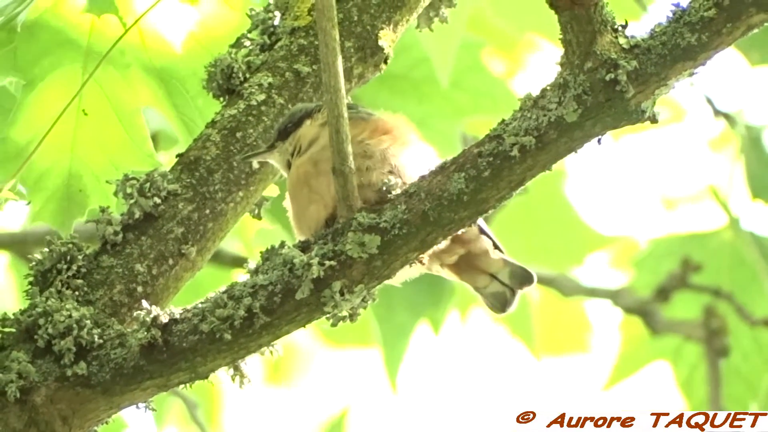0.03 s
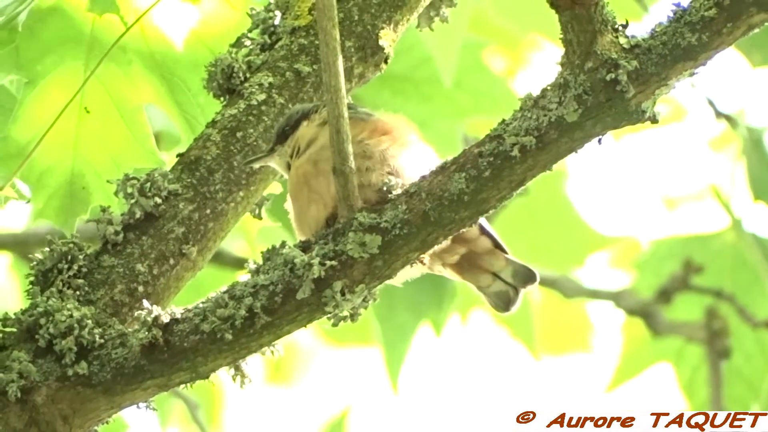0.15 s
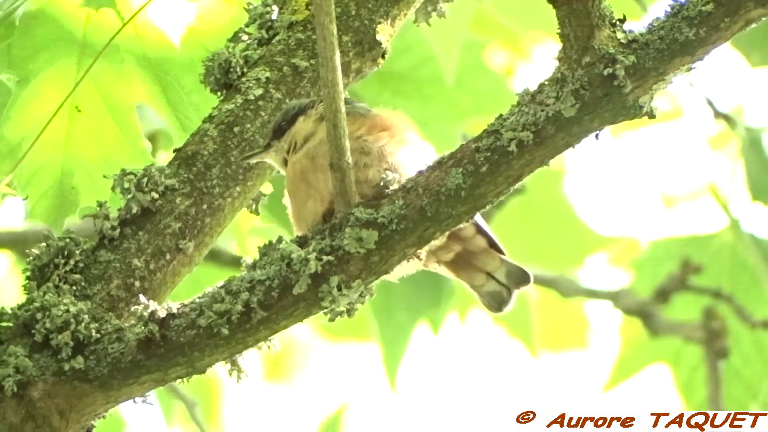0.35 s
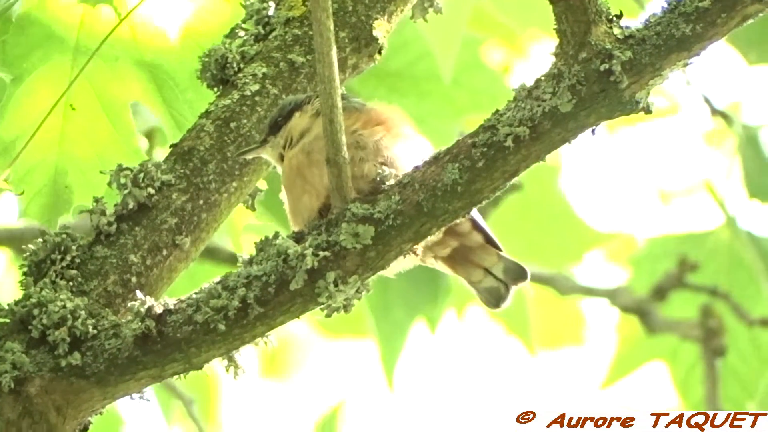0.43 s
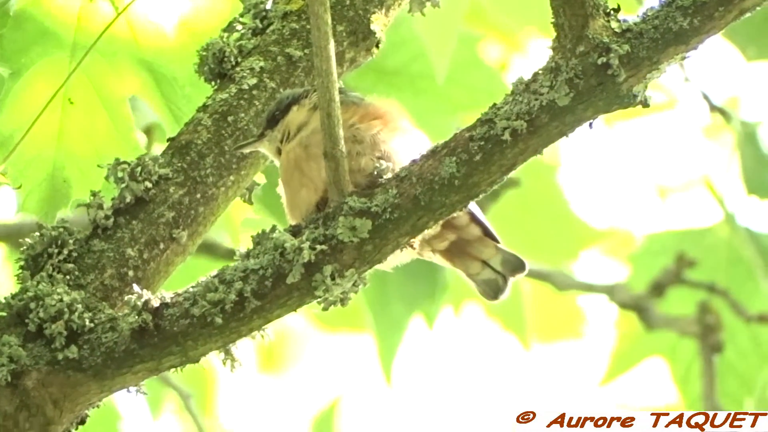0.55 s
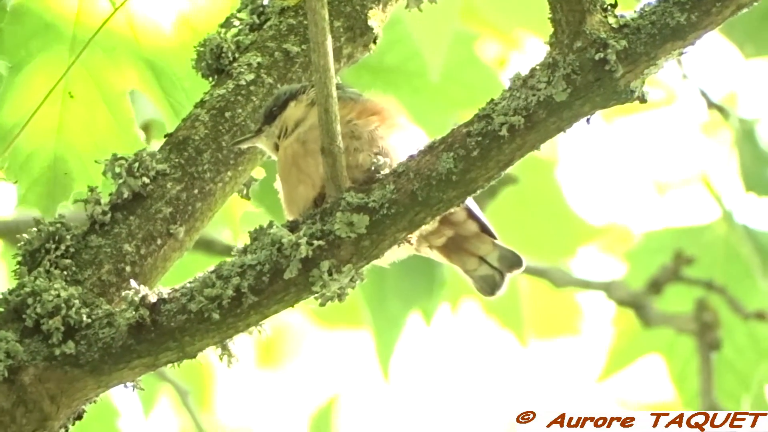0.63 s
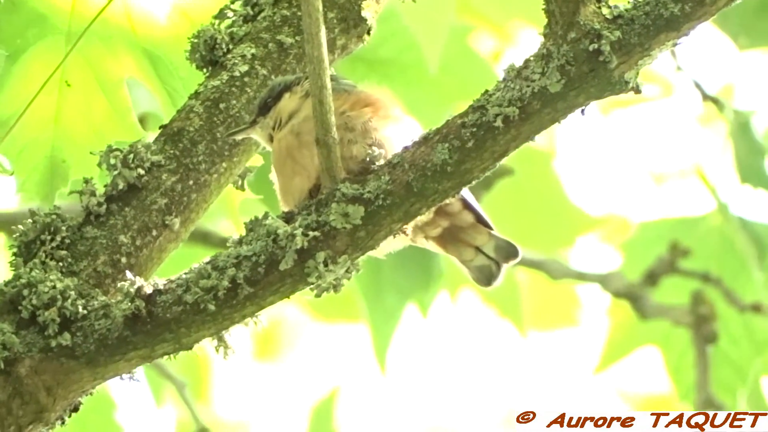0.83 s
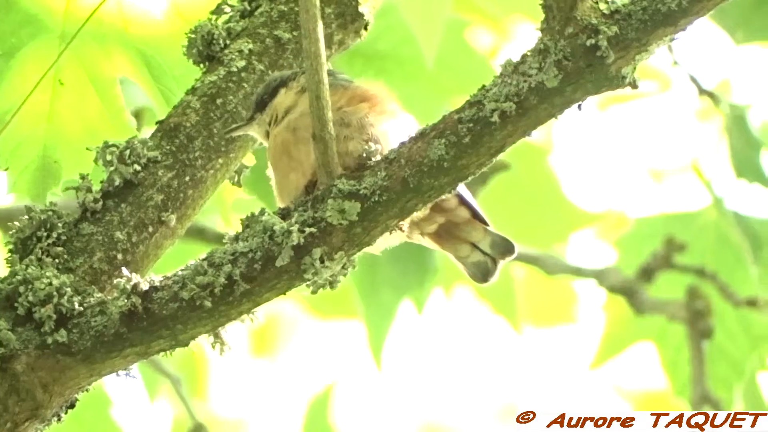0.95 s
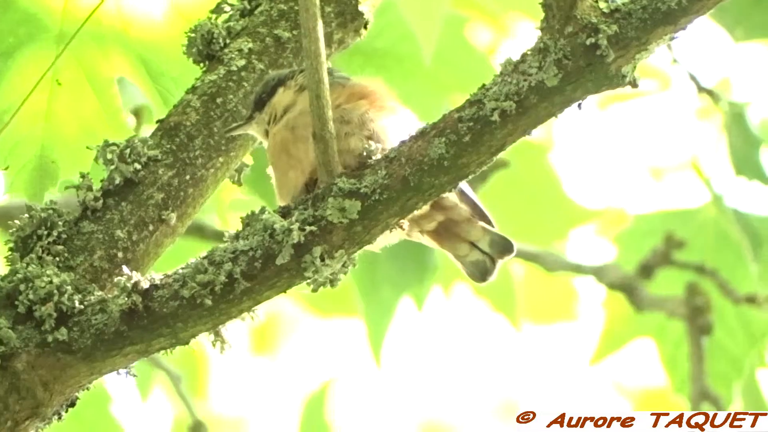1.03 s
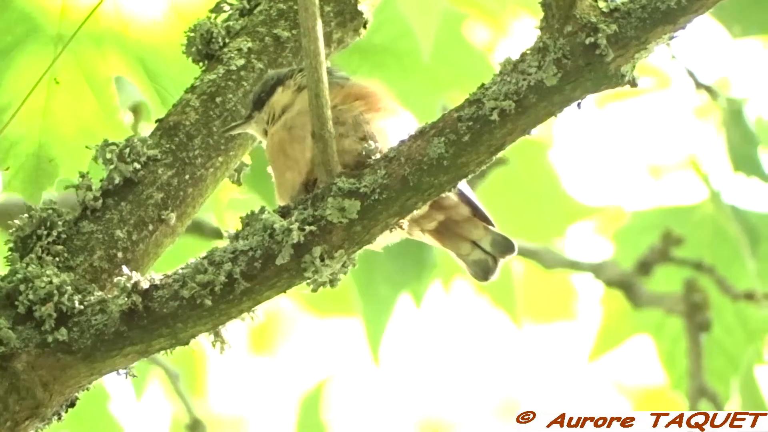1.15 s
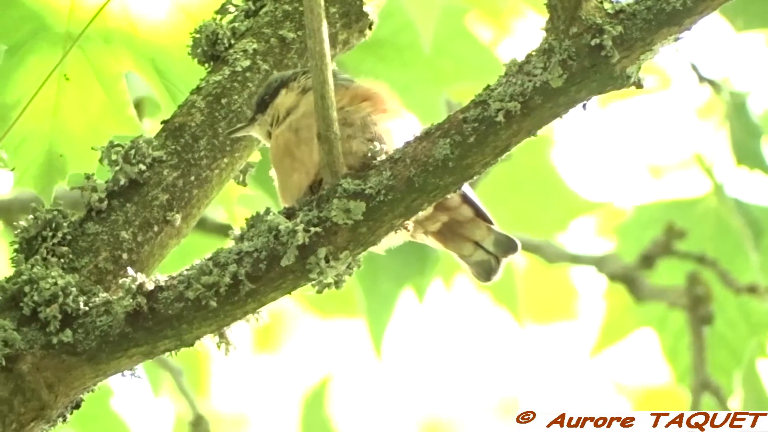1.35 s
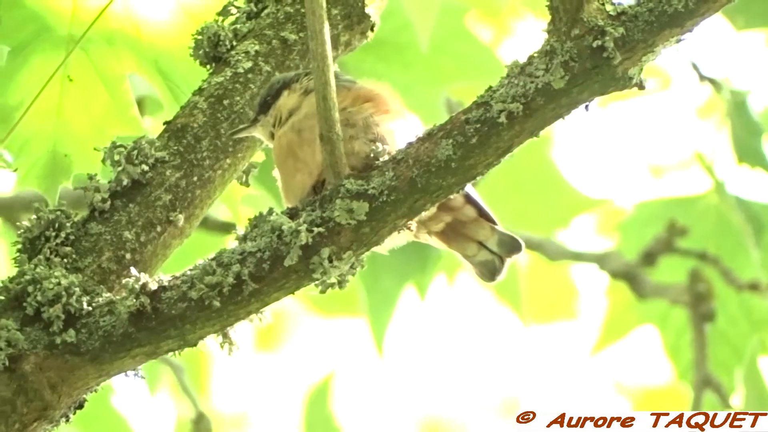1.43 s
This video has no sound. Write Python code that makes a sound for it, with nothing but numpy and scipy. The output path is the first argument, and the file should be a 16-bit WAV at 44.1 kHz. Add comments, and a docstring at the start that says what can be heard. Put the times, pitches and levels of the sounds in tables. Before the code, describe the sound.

High-pitched bird chirps and sharp whistled notes ring from a leafy tree above soft wind and hum

```python
"""Small birds call from a tree: arched whistles with a second voice on top, long thin seeps,
short chips, slurs of farther birds and one buzz. Each note is a near sine with moving pitch and level.
The foliage smears the notes into a tail by convolution with a dying noise response.
Light wind knocks on the microphone as gusty low noise; a far traffic-like rumble and hiss,
built from third-octave bands of noise, lie below."""
import sys
import numpy as np
from scipy import signal
from scipy.io import wavfile
from scipy.ndimage import map_coordinates

SR = 44100
rng = np.random.default_rng(int(sys.argv[2]) if len(sys.argv) > 2 else 0)


def amplitude_ratio(level_db):
    """Convert a level in decibels to the matching linear amplitude (field) ratio."""
    exponent = np.asarray(level_db, float) / 20
    return 10 ** exponent


def store_wav(level_fs):
    """Save 16-bit WAV to argv[1]."""
    pcm = np.round(np.clip(np.atleast_2d(level_fs), -1, 1) * 32767)
    wavfile.write(sys.argv[1], SR, pcm.T.astype(np.int16))


N = 66150   # 1.5 s

# Note levels are rms, before flutter, panning and foliage.
# pitch tracks of the arched whistles, one list each: (time [s], pitch [Hz])
ARCH_TRACKS = [
    [(0.183, 3530), (0.188, 3915), (0.191, 4780), (0.196, 5080), (0.216, 5390), (0.242, 5420),
     (0.254, 4890), (0.262, 4430)],
    [(0.451, 3698), (0.457, 4240), (0.465, 5155), (0.481, 5412), (0.504, 5450), (0.515, 5150),
     (0.528, 4150)],
    [(0.828, 3520), (0.84, 4805), (0.844, 5233), (0.862, 5395), (0.88, 5420), (0.89, 4740), (0.901, 3520)],
]
# pitch tracks of the long thin seeps, one list each: (time [s], pitch [Hz])
SEEP_TRACKS = [
    [(0.522, 8110), (0.544, 7790), (0.562, 7970), (0.572, 8156), (0.586, 8180), (0.602, 7770),
     (0.604, 7600), (0.614, 6550)],
    [(0.75, 7490), (0.77, 7653), (0.8, 8110), (0.824, 8194), (0.834, 7630), (0.842, 6800)],
    [(0.967, 7450), (0.999, 7550), (1.031, 8072), (1.055, 8067), (1.081, 7670), (1.083, 7600),
     (1.095, 6470)],
]
# level course of each arch, before its low pitches are weakened:
# (start level [dB], turning level [dB], end level [dB])
ARCH_SWELLS = [(-53, -49.5, -74), (-46, -44, -42.5), (-53, -41, -45)]
# level course of each seep, likewise: (start level [dB], turning level [dB], end level [dB])
SEEP_SWELLS = [(-56, -48.5, -55), (-55.5, -41.5, -59), (-53.5, -39.5, -48.5)]
# second voice riding on each arch: (start [s], length [s], top pitch [Hz], peak level [dB])
UPPER_VOICES = [(0.199, 0.047, 6160, -52), (0.466, 0.056, 6370, -51), (0.842, 0.077, 6300, -54.5)]
# hooked chips, up and down again: (start [s], length [s], top pitch [Hz], depth [Hz], peak level [dB])
CHIP_NOTES = [(0.172, 0.017, 6400, 1410, -58), (0.359, 0.032, 5080, 2290, -54.5),
              (0.433, 0.022, 6600, 1400, -53.5), (.739, 0.019, 5215, 1900, -47),
              (0.767, 0.0086, 5750, 405, -54), (0.809, 0.031, 6900, 2910, -55),
              (1.486, 0.036, 5130, 1300, -52.5)]
# slurs of farther birds, mostly falling:
# (start [s], length [s], first pitch [Hz], last pitch [Hz], bend exponent [1], peak level [dB])
SLUR_NOTES = [(0.009, 0.035, 8370, 7430, 1.3, -59.5), (0.112, 0.025, 7520, 5440, 1.5, -63.5),
              (0.163, 0.068, 8300, 7540, 0.59, -61), (0.379, 0.027, 7105, 5600, 2.9, -57),
              (0.417, .022, 8610, 7500, 5, -55.5), (0.724, 0.026, 8180, 8360, 0.93, -65),
              (0.841, 0.033, 8320, 8200, 0.88, -53.5), (0.816, 0.053, 5800, 5700, 1.7, -51.5)]
# wind on the microphone: (time [s], level [dB])
GUST_LEVEL = [(0.0, -90), (0.132, -81), (0.22, -59.5), (0.246, -89), (0.329, -45.5), (0.404, -71),
              (0.434, -64), (0.462, -79), (0.516, -56), (0.564, -64), (0.626, -59), (0.646, -71),
              (0.764, -68.5), (0.776, -59), (0.894, -72), (0.918, -69), (1.036, -65.5), (1.068, -51.5),
              (1.164, -57.5), (1.19, -48.5), (1.274, -56), (1.315, -51), (1.362, -71), (1.5, -72)]
# spectrum of the air, only its shape counts: (frequency [Hz], density [dB per Hz])
AIR_SPECTRUM = [(24, -41), (40, 3), (105, -4), (180, -9), (249, -8), (389, -4), (845, -6), (1520, -4.5),
                (1880, -12.5), (6350, -12.5), (7490, -15), (10900, -22), (14200, -70), (22000, -120)]
# likeness of left and right in the air: (frequency [Hz], correlation [1])
AIR_LIKENESS = [(60, 1), (220, 0.69), (820, 0.44), (3030, 0.67), (11200, 0.72)]
# balance of the air: (frequency [Hz], left minus right [dB])
AIR_BALANCE = [(60, 0.5), (340, 1.5), (1960, -0.5), (11200, -3)]
# slow swell of the rumble, only departures from the mean count: (time [s], level [dB])
RUMBLE_LEVEL = [(0.0, -59.5), (0.366, -59), (1.006, -57), (1.5, -57)]

# notes
EDGE_S, OVERTONE_DB = 0.003, -33   # overtone: second harmonic relative to the first
WOBBLE_HZ, WOBBLE_RATE_HZ = 24, 67.5   # rms pitch wobble
HOARSE_HZ, HOARSE_RATE_HZ = 85, 250   # rms of the added faster wavering
ARCH_TURN_AT, SEEP_TURN_AT = 0.83, 0.51   # share of the length
LEG_DB_PER_KHZ = 5.5   # the throat sounds weaker below a note's top pitch
UPPER_RISE_HZ, UPPER_FALL_HZ = 900, 305
CHIP_FLAT = 2.7   # exponent: flat top, steep legs
BUZZ_START_S, BUZZ_LENGTH_S = 0.877, 0.058
BUZZ_HZ, BUZZ_SAG_HZ = 8660, 253
BUZZ_DB, BUZZ_DIP_AT = -54, 0.55   # level at its dip, and the dip's share of the length
BUZZ_RATE_HZ, BUZZ_SWING_HZ, BUZZ_PULSE_DB = 340, 400, 1.5
BUZZ_ROUGH_RAD, BUZZ_ROUGH_RATE_HZ = 1.5, 57.0   # rms drift of the modulation phase
FLUTTER_DB, FLUTTER_RATE_HZ = 3.2, 120   # rms
LOW_PAN_DB, HIGH_PAN_DB = 3.5, 0.95   # left minus right: arches, upper voices, chips; seeps, slurs, buzz
# foliage
LEAF_T60_S, LEAF_ONSET_S, LEAF_LOW_HZ = 0.4, 0.005, 4800
LEAF_DB, LEAF_SIDE_DB, LEAF_LUMPS_DB = 2, -19, 1   # energy gain of mid; side relative to mid; rms lumps
ECHO_S, ECHO_DB = 0.043, -24   # one hard reflection
BOUGHS, SWAY_M, SWAY_RATE_HZ = 4, 0.016, 15   # rms path length change as the boughs stir
# wind
WIND_LOW_HZ, WIND_HIGH_HZ, BUFFET_TOP_HZ = 22, 137.6, 272
WIND_LIKENESS, WIND_PAN_DB, WIND_LUMPS_DB = 0.45, 1, 2
BUFFET_DB, BUFFET_GROWS = -57.5, 1.63   # level at the strongest gust; dB per dB of gust
# air and microphone
AIR_DB, AIR_TOP_HZ, RUMBLE_TOP_HZ = -55.5, 10500, 2500   # above AIR_TOP_HZ the density stays level
AIR_FLICKER_DB, AIR_FLICKER_RATE_HZ = 0.27, 27
CUTOFF_HZ = 10970


def rms_one(x):
    """Normalization to unit mean power."""
    return x / np.sqrt(np.mean(x ** 2) + 1e-20)


def at_hz(points, hz):
    """Interpolation of a spectrum on a logarithmic frequency axis."""
    table_hz, value = np.transpose(points)
    return np.interp(np.log(hz), np.log(table_hz), value)


def drift(rate):
    """Slow random modulation of unit rms: white noise through a double pole at rate [Hz]."""
    r = np.exp(-2 * np.pi * rate / SR)
    noise = rng.standard_normal(N + SR)
    return rms_one(signal.lfilter([1], [1, -2 * r, r * r], noise)[SR:])   # settled part only


def pair(mid, side, alike, pan_db):
    """Interchannel correlation: two unrelated signals mix by sum and difference into left and right."""
    alike = np.clip(alike, -1, 1)
    spread = np.sqrt(1 - alike) * side * np.array([[1], [-1]])
    balance = amplitude_ratio(np.array([[pan_db], [-pan_db]]) / 2)
    return (np.sqrt(1 + alike) * mid + spread) * balance


def swell(u, db, turn_at):
    """Amplitude envelope: the level runs from start through a rounded turn to end, by two parabolas."""
    start_db, turn_db, end_db = db
    at = np.clip(turn_at, 0.1, 0.9)
    before = np.clip(1 - u / at, 0, 1) ** 2
    after = np.clip((u - at) / (1 - at), 0, 1) ** 2
    return turn_db + (start_db - turn_db) * before + (end_db - turn_db) * after


def whistle(start, length, pitch_hz, level_db, wobble):
    """Frequency modulation: phase integrates pitch; pitch and level are functions of the share u of length."""
    t = np.arange(N) / SR - start
    u = np.clip(t / length, 0, 1)
    edge = np.clip(np.minimum(t, length - t) / EDGE_S, 0, 1)
    phase = 2 * np.pi * np.cumsum(pitch_hz(u) + WOBBLE_HZ * wobble) / SR
    tone = np.sin(phase) + amplitude_ratio(OVERTONE_DB) * np.sin(2 * phase)
    return np.sqrt(2) * edge * amplitude_ratio(level_db(u)) * tone


def glides(tracks, swells, turn_at, wobble):
    """Pitch-dependent radiation: arches and seeps follow their tracks and weaken below their top pitch."""
    out = 0
    for track, db in zip(tracks, swells):
        s, hz = np.transpose(track)
        length = s[-1] - s[0]
        pitch = lambda u: np.interp(s[0] + u * length, s, hz)
        weaker_db = lambda u: LEG_DB_PER_KHZ * (hz.max() - pitch(u)) / 1000
        level = lambda u: swell(u, db, turn_at) - weaker_db(u)
        out = out + whistle(s[0], length, pitch, level, wobble)
    return out


def upper_voices(wobble):
    """Second voice: an independent tone rises fast, holds near its top and sags above each arch."""
    out = 0
    for start, length, top, db in UPPER_VOICES:
        rise = lambda u: UPPER_RISE_HZ * np.clip(1 - 3.55 * u, 0, 1) ** 2
        fall = lambda u: UPPER_FALL_HZ * np.clip(1.5 * u - 0.5, 0, 1) ** 2
        pitch = lambda u: top - rise(u) - fall(u)
        level = lambda u: swell(u, (db - 1.0, db, db - 10), 0.19)
        out = out + whistle(start, length, pitch, level, wobble)
    return out


def chips(wobble):
    """Symmetric frequency sweep: pitch climbs to a flat top and drops again, loudest midway."""
    out = 0
    for start, length, top, depth, db in CHIP_NOTES:
        pitch = lambda u: top - depth * np.abs(2 * u - 1) ** CHIP_FLAT
        level = lambda u: db - 9 * (2 * u - 1) ** 2
        out = out + whistle(start, length, pitch, level, wobble)
    return out


def slurs(wobble):
    """One-way frequency sweep: pitch follows a power law, and the level peaks early."""
    out = 0
    for start, length, first, last, bend, db in SLUR_NOTES:
        pitch = lambda u: first - (first - last) * u ** bend
        level = lambda u: swell(u, (db - 17, db, db - 12), 0.21)
        out = out + whistle(start, length, pitch, level, wobble)
    return out


def buzz(wobble):
    """Sidebands: fast, uneven modulation of pitch and level turns a high tone rough."""
    turn = 2 * np.pi * BUZZ_RATE_HZ * np.arange(N) / SR + BUZZ_ROUGH_RAD * drift(BUZZ_ROUGH_RATE_HZ)
    pitch = lambda u: BUZZ_HZ - BUZZ_SAG_HZ * u + BUZZ_SWING_HZ * np.sin(turn)
    course_db = (BUZZ_DB + 2.5, BUZZ_DB, BUZZ_DB + 5)
    level = lambda u: swell(u, course_db, BUZZ_DIP_AT) + BUZZ_PULSE_DB * np.cos(turn)
    return whistle(BUZZ_START_S, BUZZ_LENGTH_S, pitch, level, wobble)


def birds():
    """Superposition: all notes add up dry, in two groups placed by level difference."""
    wobble = drift(WOBBLE_RATE_HZ)
    # second voice and chips waver faster
    hoarse = wobble + HOARSE_HZ / WOBBLE_HZ * drift(HOARSE_RATE_HZ)
    low = glides(ARCH_TRACKS, ARCH_SWELLS, ARCH_TURN_AT, wobble) + upper_voices(hoarse) + chips(hoarse)
    high = glides(SEEP_TRACKS, SEEP_SWELLS, SEEP_TURN_AT, wobble) + slurs(wobble) + buzz(wobble)
    # throats and moving leaves make the level flutter
    low = low * amplitude_ratio(FLUTTER_DB * drift(FLUTTER_RATE_HZ))
    high = high * amplitude_ratio(FLUTTER_DB * drift(FLUTTER_RATE_HZ))
    return pair(low, 0, 0, LOW_PAN_DB) + pair(high, 0, 0, HIGH_PAN_DB)


def foliage(x):
    """Multiple scattering: leaves answer high pitches with a dying, lumpy noise response, nearly mono."""
    t = np.arange(N) / SR
    decay = amplitude_ratio(-60 * t / LEAF_T60_S + LEAF_LUMPS_DB * drift(35))
    shape = decay * (1 - np.exp(-t / LEAF_ONSET_S))
    mid, side = rng.standard_normal((2, N)) * shape / np.sqrt(np.sum(shape ** 2))
    response = amplitude_ratio(LEAF_DB) * (mid + amplitude_ratio(LEAF_SIDE_DB) * side * [[1], [-1]])
    response[:, int(ECHO_S * SR)] += amplitude_ratio(ECHO_DB)
    bright = signal.sosfilt(signal.butter(3, LEAF_LOW_HZ, "high", fs=SR, output="sos"), x)
    bough_of_sample = rng.integers(0, BOUGHS, N)
    out = x
    # each bough scatters a share and sways on its own, which bends the pitch a little
    for k in range(BOUGHS):
        tail = signal.fftconvolve(bright, response * (bough_of_sample == k), axes=1)[:, :N]
        read_at = np.arange(N) - SWAY_M / 343 * SR * drift(SWAY_RATE_HZ)   # 343 m/s
        out = out + np.array([map_coordinates(v, [read_at], order=3) for v in tail])
    return out


def wind():
    """Wind noise at the microphone: lumpy low noise follows the gusts; strong gusts reach higher."""
    s, db = np.transpose(GUST_LEVEL)
    gust_db = np.interp(np.arange(N) / SR, s, db)
    sos = signal.butter(3, [WIND_LOW_HZ, WIND_HIGH_HZ], "band", fs=SR, output="sos")
    mid, side = signal.sosfilt(sos, rng.standard_normal((2, N + SR)))[:, SR:]
    lumps = rms_one(pair(mid, side, WIND_LIKENESS, WIND_PAN_DB) * amplitude_ratio(WIND_LUMPS_DB * drift(34)))
    sos = signal.butter(2, [WIND_HIGH_HZ, BUFFET_TOP_HZ], "band", fs=SR, output="sos")
    buffet = rms_one(signal.sosfilt(sos, rng.standard_normal((2, N))))
    buffet_db = BUFFET_DB + BUFFET_GROWS * (gust_db - db.max())
    return amplitude_ratio(gust_db) * lumps + amplitude_ratio(buffet_db) * buffet


def air():
    """Band synthesis: third-octave noises, each flickering, form far rumble and hiss; the rumble swells."""
    s, db = np.transpose(RUMBLE_LEVEL)
    rise_db = np.interp(np.arange(N) / SR, s, db - db.mean())
    edges = 30 * 2 ** np.arange(0, 8.8, 1 / 3)
    white = rng.standard_normal((2, 2, N + SR // 2))   # neighbouring bands use unrelated noises
    out = 0
    for k, (low, high) in enumerate(zip(edges, edges[1:])):
        sos = signal.butter(2, [low, high], "band", fs=SR, output="sos")
        mid, side = signal.sosfilt(sos, white[k % 2])[:, -N:]
        hz = min(np.sqrt(low * high), AIR_TOP_HZ)
        flicker_db = AIR_FLICKER_DB * drift(AIR_FLICKER_RATE_HZ)
        level_db = at_hz(AIR_SPECTRUM, hz) + flicker_db + rise_db * (hz < RUMBLE_TOP_HZ)
        out = out + amplitude_ratio(level_db) * pair(mid, side, at_hz(AIR_LIKENESS, hz), at_hz(AIR_BALANCE, hz))
    return amplitude_ratio(AIR_DB) * rms_one(out)


def scene():
    """Superposition: birds in the leaves, wind and far air add linearly."""
    return foliage(birds()) + wind() + air()


def roll_off(x):
    """The treble ends steeply here."""
    return signal.sosfilt(signal.butter(12, 11810, fs=SR, output="sos"), x)


def record(dry):
    """Band limitation: a steep elliptic low-pass removes the top of the spectrum."""
    sos = signal.ellip(14, 0.5, 70, CUTOFF_HZ, fs=SR, output="sos")   # ripple, stop band [dB]
    mix = signal.sosfilt(sos, dry)
    return roll_off(mix)


dry = scene()
out = record(dry)
store_wav(out)
```